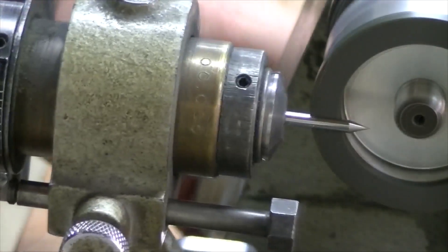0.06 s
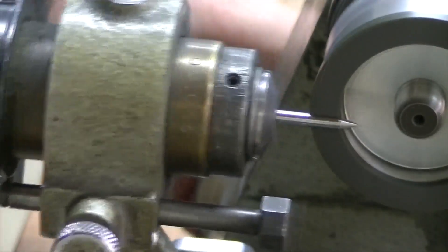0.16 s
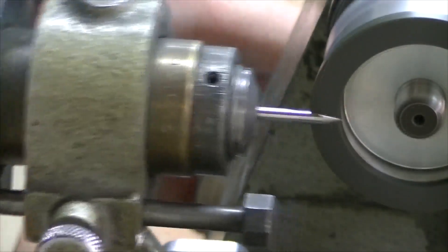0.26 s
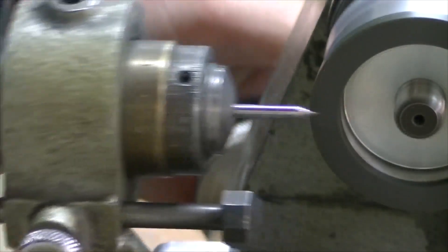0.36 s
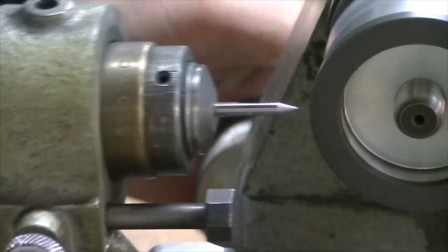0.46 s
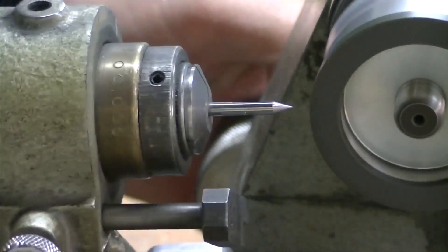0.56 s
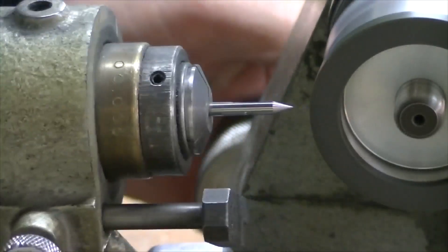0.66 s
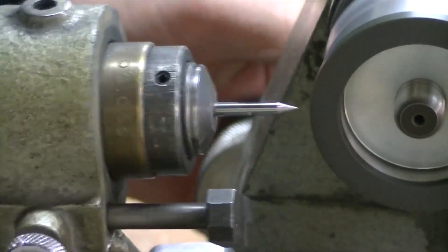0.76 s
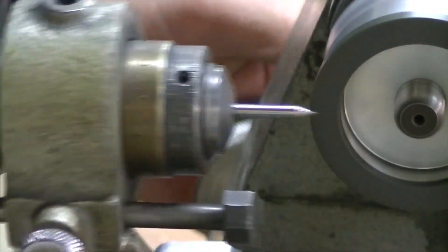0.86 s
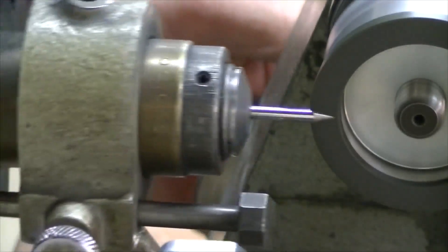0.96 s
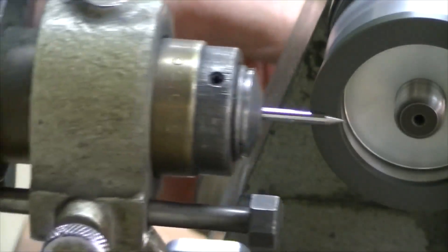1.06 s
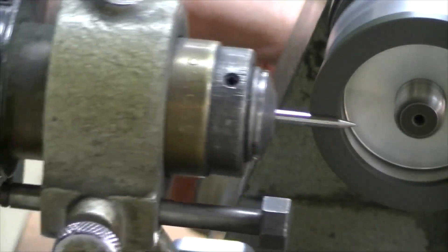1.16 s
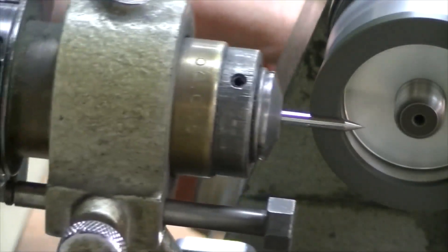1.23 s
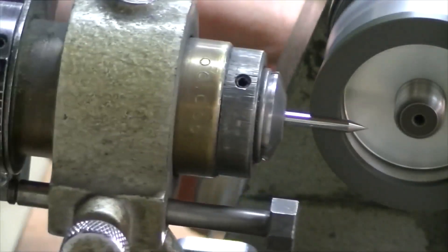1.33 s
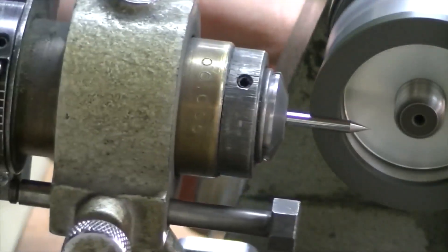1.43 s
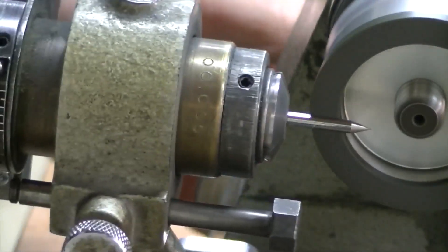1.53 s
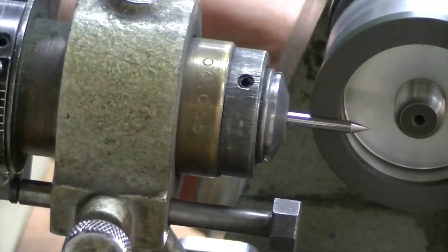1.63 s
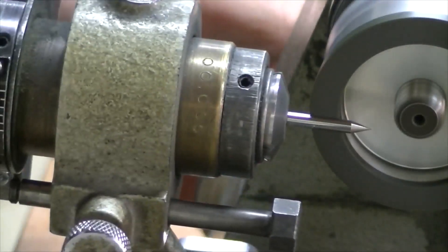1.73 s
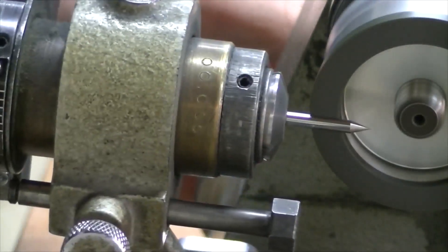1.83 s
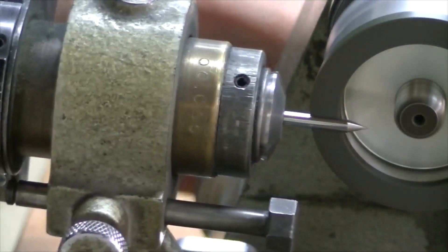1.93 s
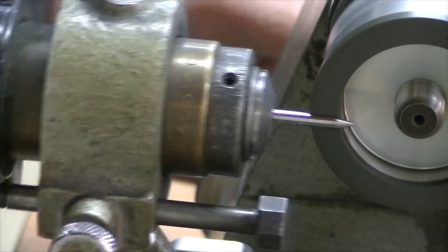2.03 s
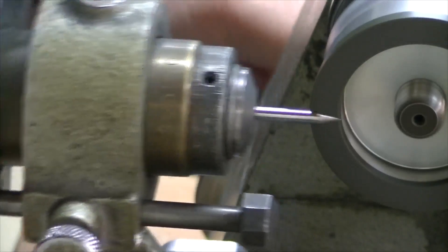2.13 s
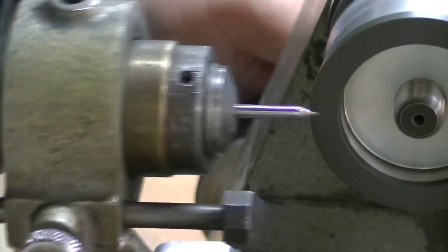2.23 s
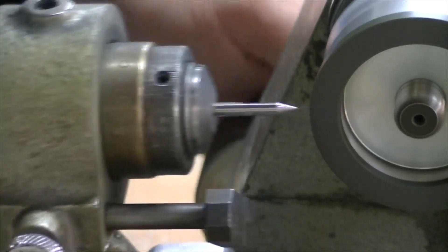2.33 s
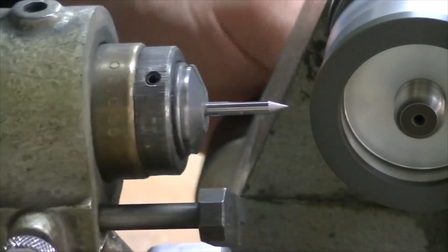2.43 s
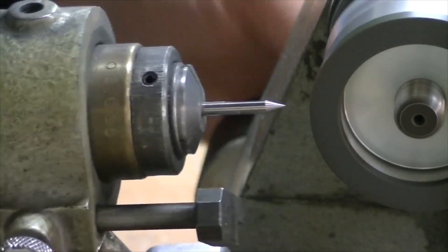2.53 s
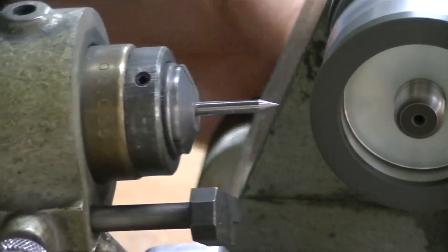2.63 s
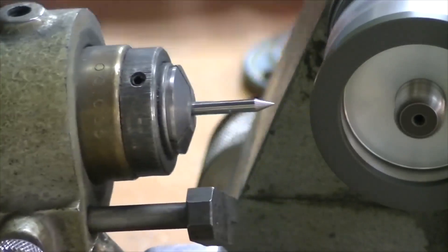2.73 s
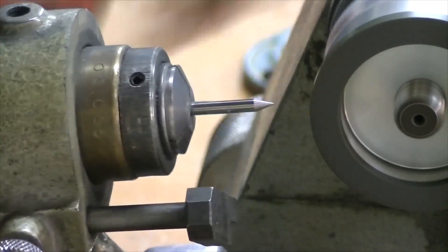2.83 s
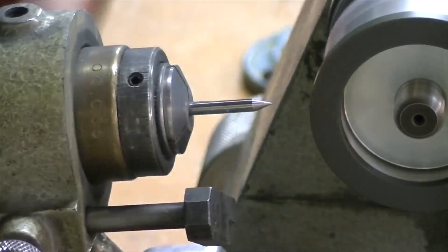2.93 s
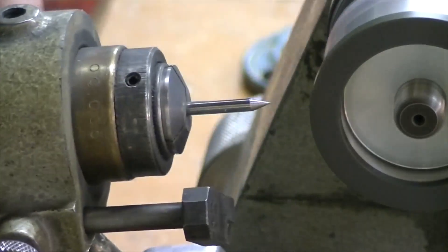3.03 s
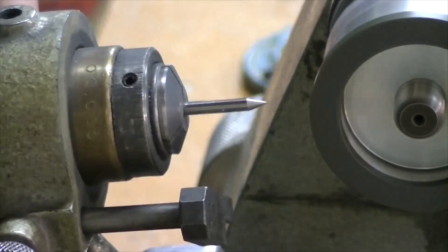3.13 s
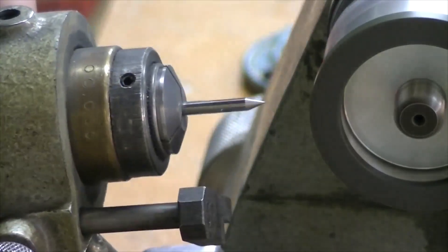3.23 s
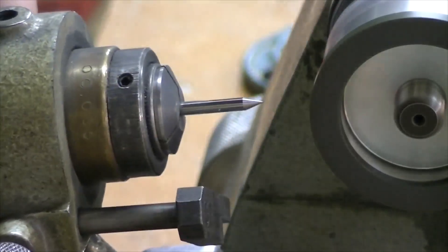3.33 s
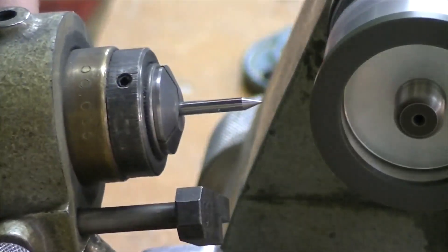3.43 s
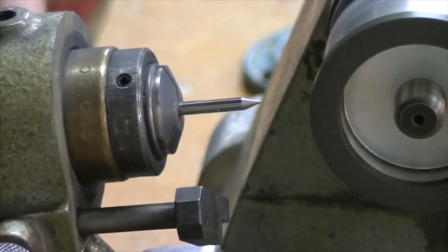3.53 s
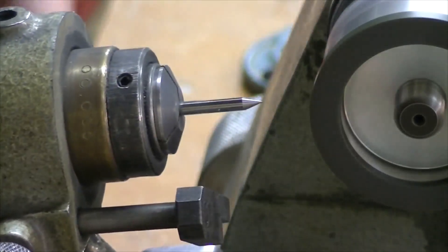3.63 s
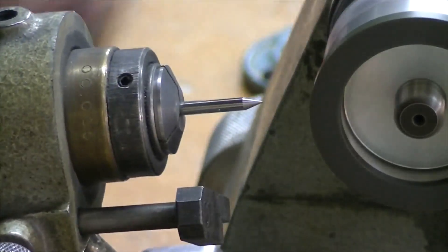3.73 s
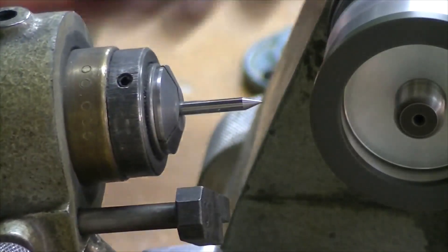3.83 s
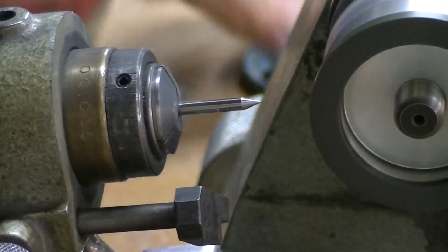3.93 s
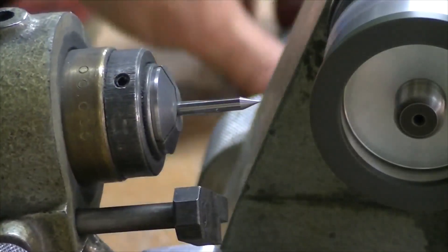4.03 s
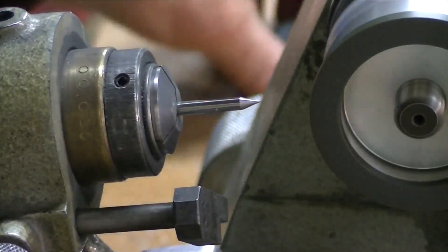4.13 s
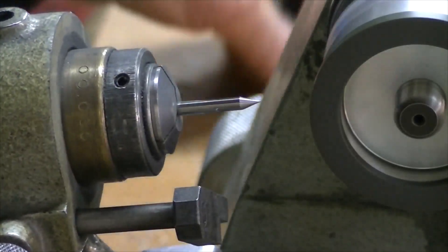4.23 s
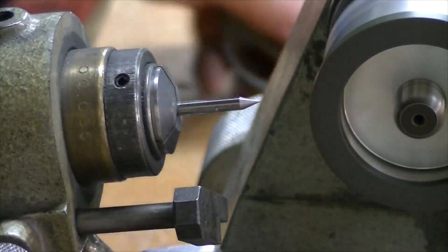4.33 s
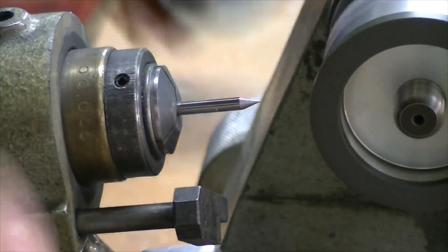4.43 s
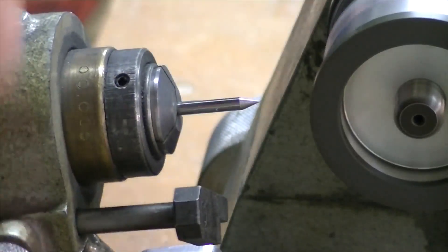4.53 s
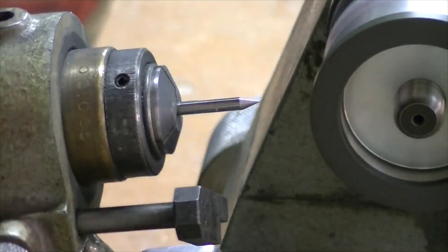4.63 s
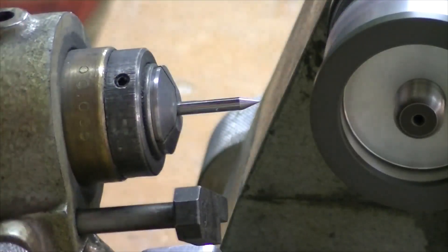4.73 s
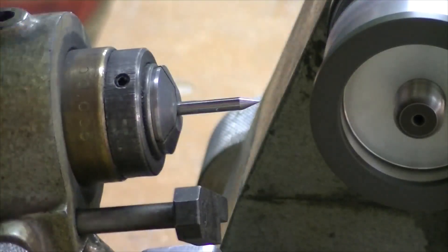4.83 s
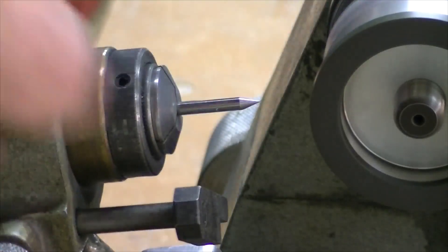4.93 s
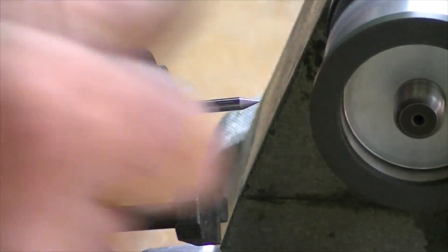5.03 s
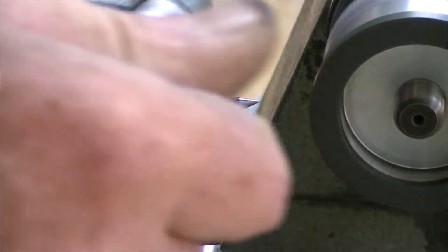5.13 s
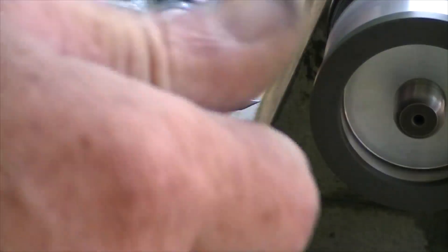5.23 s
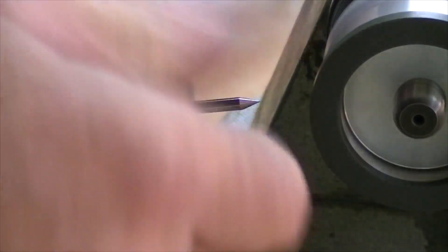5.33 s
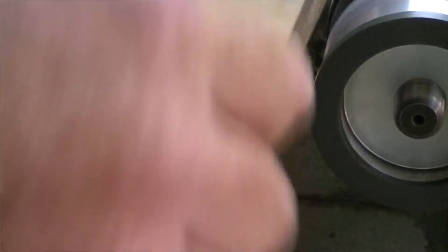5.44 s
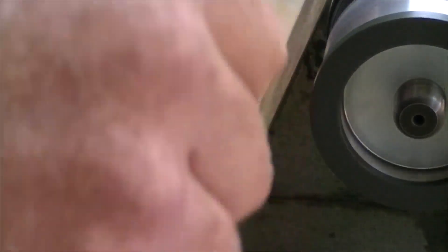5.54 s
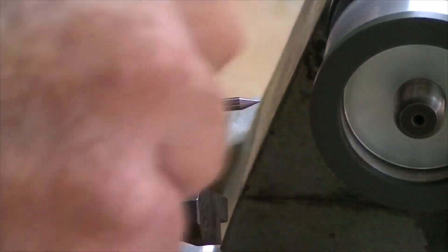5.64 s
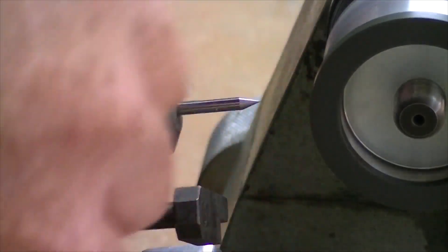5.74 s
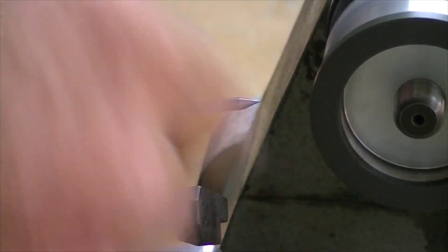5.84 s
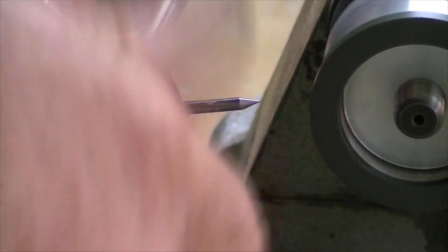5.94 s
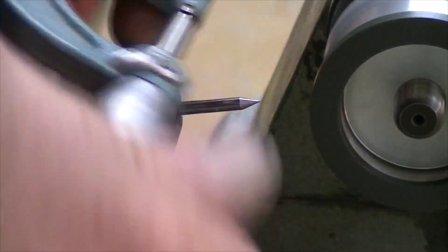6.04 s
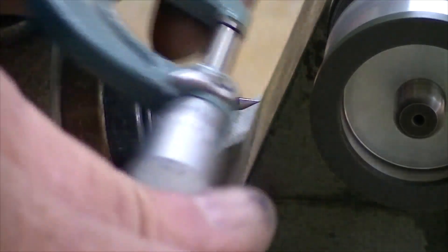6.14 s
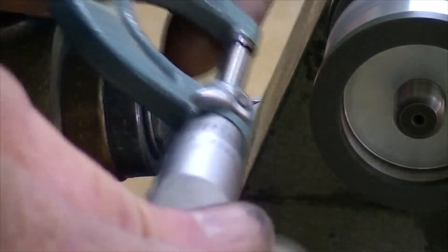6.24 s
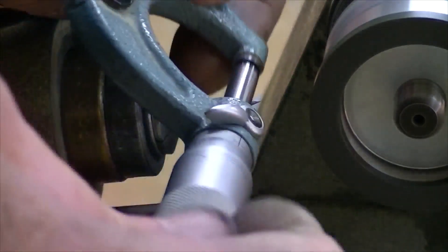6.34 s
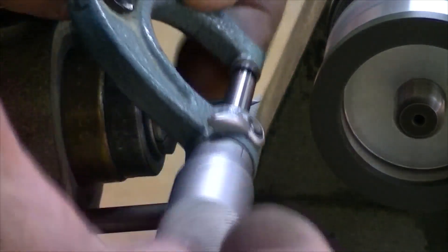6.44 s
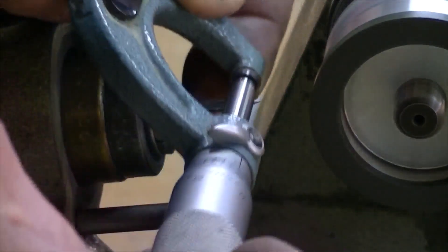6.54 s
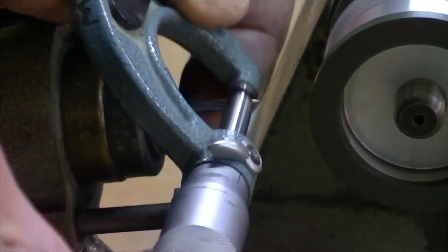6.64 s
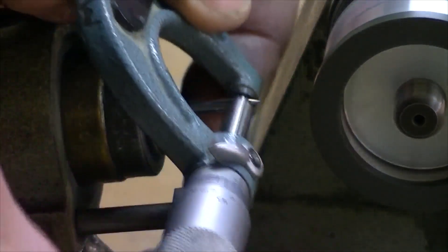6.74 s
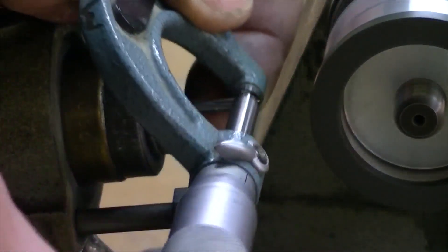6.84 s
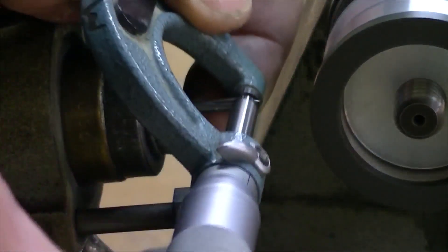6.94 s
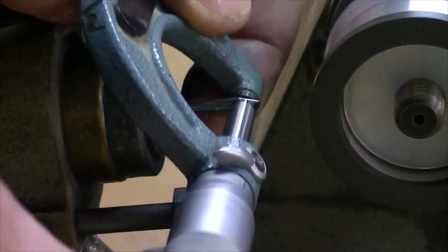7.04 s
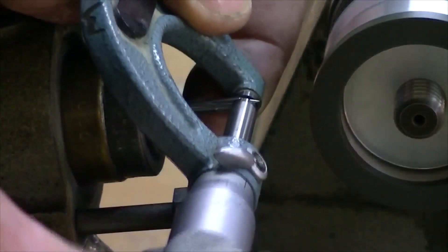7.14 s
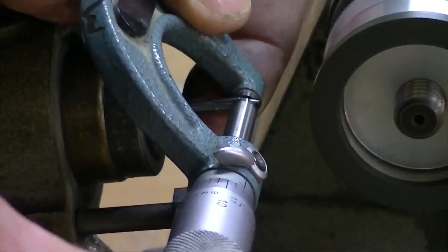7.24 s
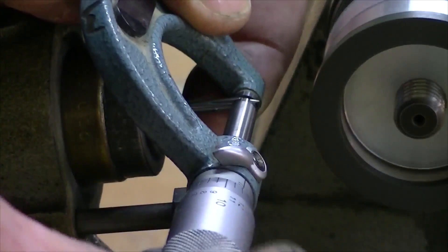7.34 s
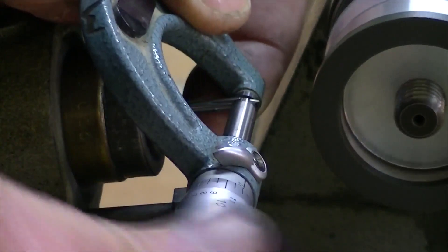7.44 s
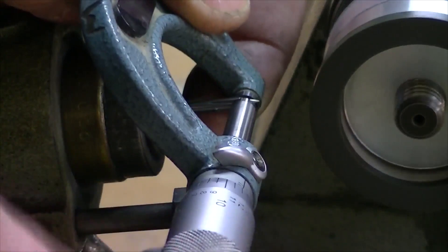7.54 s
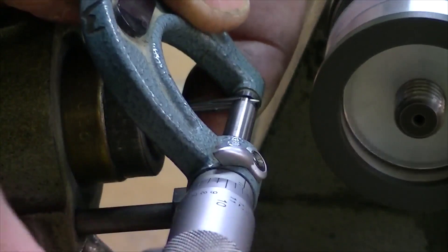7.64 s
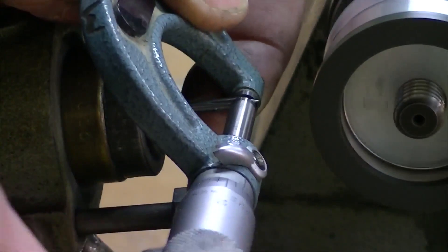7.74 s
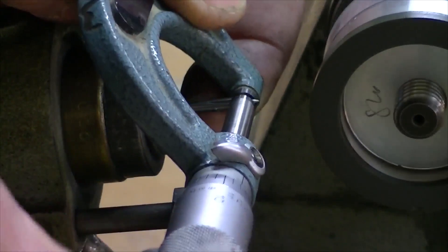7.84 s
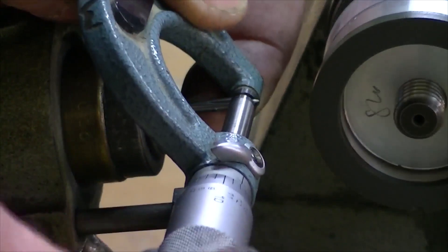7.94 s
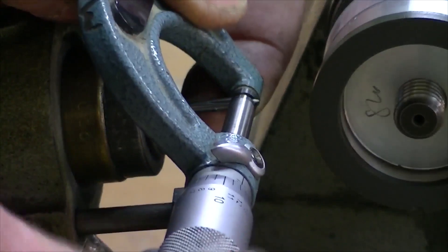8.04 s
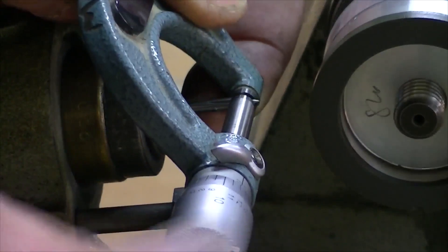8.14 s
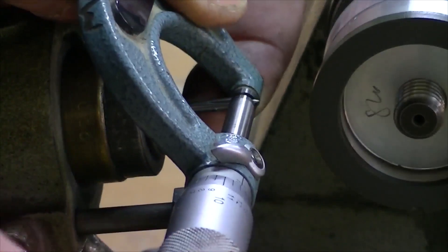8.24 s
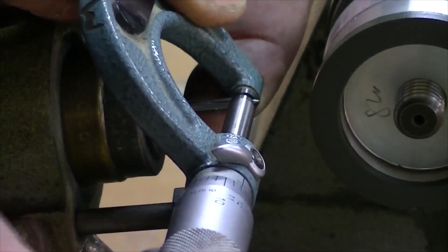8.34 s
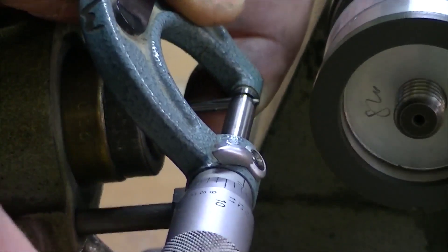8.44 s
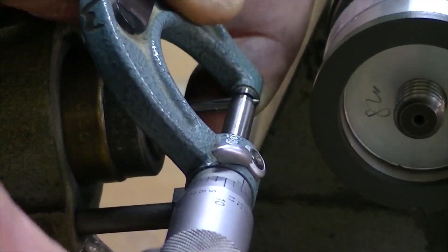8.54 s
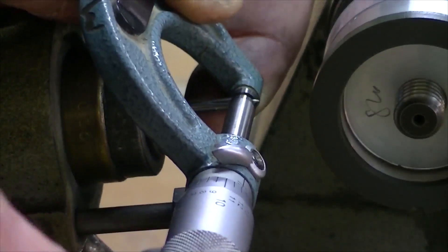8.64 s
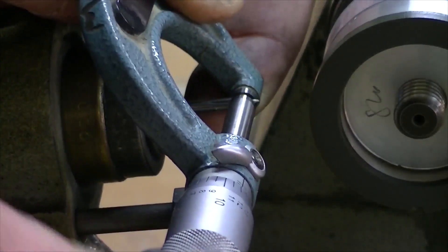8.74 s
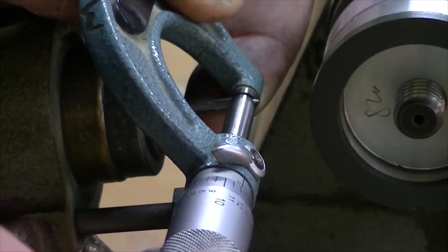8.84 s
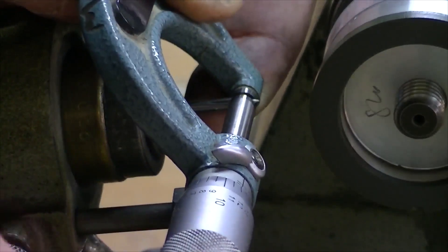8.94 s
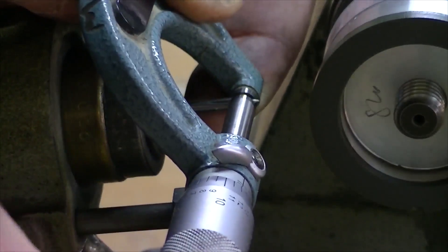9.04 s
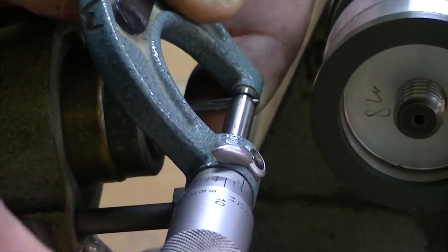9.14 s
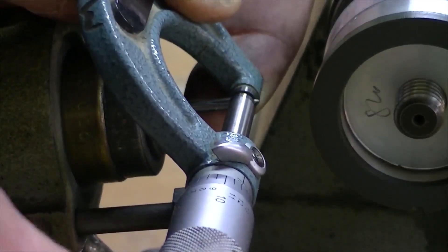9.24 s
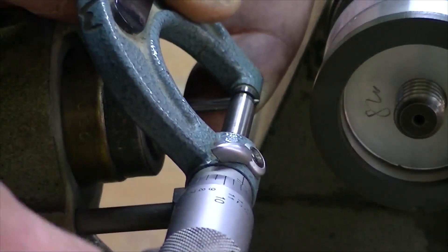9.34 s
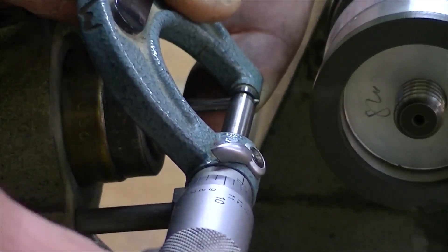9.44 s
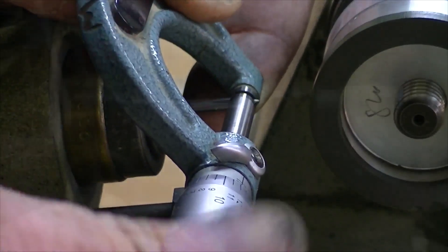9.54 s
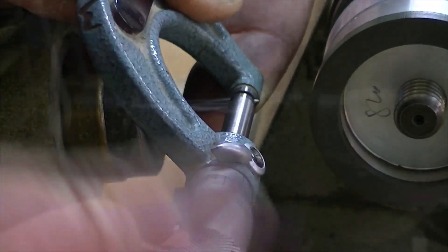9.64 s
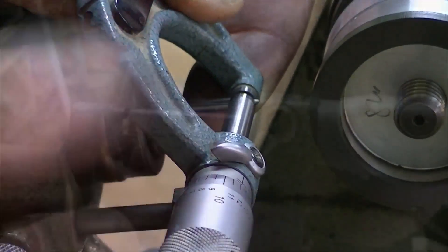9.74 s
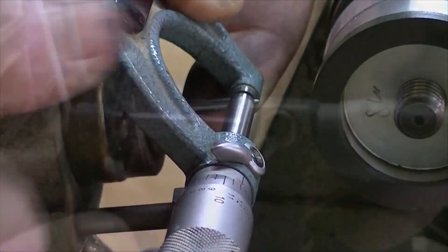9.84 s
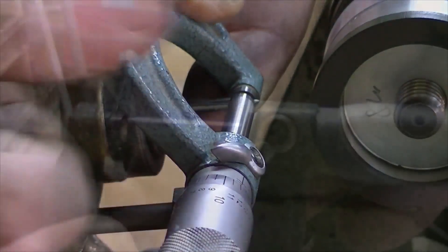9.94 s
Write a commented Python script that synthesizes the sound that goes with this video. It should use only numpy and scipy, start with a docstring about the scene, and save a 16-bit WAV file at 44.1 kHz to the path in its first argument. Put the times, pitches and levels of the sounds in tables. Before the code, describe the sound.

Close, nearly centred pickup in a small quiet workshop. At the start a small spindle is already spinning fast on worn bearings: dense gritty whir, thin metallic whines and a tonal hum. It dips slightly, rises to a peak around 1.1-1.5 s, drops by 2 s, and surges again to about 2.6 s. Then it coasts steadily, the whines sliding down and sinking into the noise, squealing briefly near 3.2 s. From 5 to 7 s it becomes a coarse, throbbing, rattling rumble, fading after 7 s with a few hollow knocks around 7.5-7.7 s. Faint thimble ticks run from 6.95 to 7.8 s. Bright, hard steel ratchet clicks follow: a rapid cluster at 7.8-8.05 s, five at 8.5-8.7 s, six at 9.15-9.4 s, each with a tiny shiver and short room tail. Very faint pips appear at 8.1-8.9 s; soft shop air remains.

```python
"""A small grinding spindle on worn ball bearings speeds up twice, then coasts almost to a stop.
Rough noise, loose knocks and whining lines from the bearings ring its casing; hums follow the speed.
Then a hand turns a micrometer: its thimble ticks, and its ratchet clicks in three bursts of
filtered noise and ringing steel. A few faint pips sound among the clicks; behind it all lies a
quiet shop, made of soft noise, a faint wavering tone and a short echo tail."""
import sys
import numpy as np
from scipy import signal
from scipy.fft import rfft, irfft
from scipy.io import wavfile
from scipy.ndimage import uniform_filter1d

SR = 44100
rng = np.random.default_rng(int(sys.argv[2]) if len(sys.argv) > 2 else 0)


def persist_wave(psi):
    """Save psi, clipped to +-1, as 16-bit WAV."""
    counts = np.round(np.clip(psi, -1, 1) * 32767).astype(np.int16)
    wavfile.write(sys.argv[1], SR, np.atleast_2d(counts).T)


N = 440118
T, HZ = np.arange(N) / SR, np.fft.rfftfreq(2048, 1 / SR)  # time of each sample; pitch of each filter band

# Shaft speed, two spurts and a long coast: t/s, turns per second f/Hz
SHAFT_SPEED = [(0, 230.4), (.12, 217.5), (.22, 217), (.42, 230), (.62, 251), (.9, 273.5), (1.13, 284.5),
               (1.22, 283.5), (1.4, 277.8), (1.53, 277), (1.8, 235), (1.97, 221.5), (2.12, 231.5),
               (2.3, 240), (2.63, 270.5), (3.02, 245.3), (3.6, 211), (4.8, 146), (5.4, 119.7), (6, 89.4),
               (7.9, 1)]
# Bearing rumble: t/s, level/dB, brightness/(dB per octave)
RUMBLE = [(0.0, -17.5, 0), (0.7, -17.5, 1.16), (1.5, -17, 0.3), (3.3, -17, 0.53), (3.6, -17, 0.67),
          (6.0, -14.5, -0.1), (6.3, -15, 0.5), (6.9, -18, 0.24), (7.45, -25.5, 0.4), (7.63, -32.5, -0.3),
          (7.76, -39.5, 1), (8.0, -70, -11)]
# Colour of the rumble at high, low and crawling speed: f/Hz, level/dB (per Hz)
FAST_COLOUR = [(18, -86.5), (30, -49), (93, -27), (170, -21.5), (266, -12.5), (328, -9), (1070, -3),
               (1280, -2), (1720, -7), (3490, -6.5), (7270, -20.5), (9220, -15.5), (12000, -25),
               (16000, -36)]
SLOW_COLOUR = [(18, -79.5), (30, -37), (123, -17.5), (324, -28.5), (379, -16.5), (591, -14.5), (709, -7.5),
               (1050, -13.5), (1170, -6), (1870, -12), (2910, 2), (7260, -19.5), (8950, -18.5),
               (12000, -25), (15500, -37.5)]
CRAWL_COLOUR = [(18, -86), (30, -44), (303, -17), (384, -1.5), (499, -7), (721, -4), (1040, -14),
                (1190, -3), (1500, -7), (3490, -10.5), (6900, -25.5), (9220, -23.5), (11000, -27.5),
                (13200, -29.5), (16000, -37)]
# Shaft speeds that go with the crawling, slow and fast colours: f/Hz
COLOUR_SPEEDS_HZ = [22, 103.1, 244.6]
# Casing modes, the pitches at which it likes to ring: f/Hz
MODES_HZ = [388, 467, 711, 958, 1140, 1200, 1320, 1400, 1600, 2375, 2960, 3250, 3475, 3640, 3980, 4135,
            4345, 4600, 5290, 6010, 6285, 6945, 9248]
# How each casing mode stands out: width/Hz, boost when fast level/dB, boost when slow level/dB
CASING = [(70, -9.5, 8.4), (23.1, 1.5, 7.3), (31.2, 8.5, 12), (39.8, 6.5, 12), (40, -11.5, 9),
          (30.23, 7.5, 17.9), (117, 5, 4.48), (58.6, 4.5, 1.6), (99, -1, 1.9), (170, 2, 11.2),
          (110, 8, 6.6), (60, 7.5, 3.3), (100, 5.5, 5.7), (80, 2, 9.2), (60, 7.5, 4.6), (143.8, 1.5, 1.7),
          (60, 5, 7.4), (150, -0.5, 1.1), (194.6, 4.5, 5.7), (90, 3.5, 3), (80, 6.5, 4), (80, 2.5, 2.9),
          (153, 8, 6.3)]
SURGE_DB, SURGES_PER_S = 1.8, 5  # chance swelling of each casing mode

# Single lines from cage, shaft and passing balls: multiple of the shaft speed
ORDER_LINES = [3, 3.29, 4, 4.38, 4.71, 6.67, 7, 8, 9.25, 13, 15.3]
# Their starting levels against the race noise: level/dB
ORDER_LINES_DB = [-29, -33, -32, -38, -27.5, -32, -31, -28, -31, -30, -30]
BALL_SPIN = 2.26  # turns of a ball for each turn of the shaft
# Combs of lines one ball spin apart: first multiple of the speed, number of lines
COMBS = [(11.2, 9), (11.56, 9), (9.72, 5)]
# Starting level of each comb: level/dB
COMB_DB = [-26.5, -27.0, -29.0]
# Outline laid over the combs: multiple of the speed, level/dB
COMB_SHAPE = [(9.7, -6), (13.5, -2), (16, 1.5), (19, -1), (25, 1), (29.6, -4)]
# Squeals, where lines near one multiple flare up: t/s, length/s, multiple of the speed, level/dB
SQUEALS = [(-.3, .85, 15.9, 9), (.55, .6, 11.4, 5), (.6, .65, 16.1, 3), (.9, .9, 4.7, 3), (.9, .5, 24.8, 3),
           (2.38, .25, 15.9, 7), (2.7, .5, 18.2, 5), (2.75, .35, 25, 5), (3.1, .38, 15.7, 10),
           (3.0, .9, 13.5, 3), (3.05, .5, 27.2, 7), (3.7, .7, 20.3, 4)]
SQUEAL_SPAN = 1.2  # width of a squeal, in multiples of the speed
SING_DB, SING_SPREAD = 5.0, 1.3  # most that a casing mode lifts a line; reach in mode widths
SLIP_DB, FLUTTER_DB = 3.2, 2.0  # slow swell and quick flutter of each line
SKID_HZ_PER_S, SKID_DB_PER_HZ_PER_S = 62, -.14  # braking beyond this makes balls skid and lines fade
THROB, THROB_BELOW_HZ, THROB_ORDER = .22, 90.0, .782  # slow bearing throbs twice per turn of the cage

# Hums of unbalance, cage, twice a turn, ball spin, shaft less cage, twice shaft less cage:
# multiple of the shaft speed
HUMS = [1, .391, 2, 2.266, .62, 1.62]
# Their strengths before speed and stand act on them: level/dB
HUMS_DB = [0.5, -2.5, -10.0, -9.5, -15.5, -19]
# How far each hum comes and goes: level/dB
HUMS_WAVER_DB = [.7, 1.0, 2.0, 1.8, 3.0, 3.0]
HUM_DB_PER_DECADE = 23  # hums grow with speed
# How well stand and bench carry a hum: f/Hz, level/dB
STAND = [(40, -58), (60, -63), (76, -47), (90, -47.5), (103, -43), (111, -51), (140, -34.5), (163, -49),
         (182, -44.5), (196, -37.5), (235, -36.5), (284, -29.5), (330, -36.5), (372, -24.5), (420, -29.5),
         (445, -36), (468, -19.5), (500, -29.5), (535, -31), (565, -25), (600, -35.5), (640, -29)]
# Last ball knocks ringing the casing: t/s, level/dB, f/Hz, time to fall by 60 dB/s
LAST_KNOCKS = [(7.5, -20.5, 384, 0.32), (7.569, -18.5, 377, 0.21), (7.64, -14, 726, 0.089),
               (7.69, -14.5, 712, .17), (7.81, -32, 470, 0.18), (7.86, -41, 712, .2)]
# Stereo width of the rumble, side against mid: f/Hz, level/dB
RUMBLE_WIDTH = [(20, -2.5), (60, -12), (100, -22), (180, -12.5), (310, -19), (550, -20), (950, -24.5),
                (1650, -24.5), (2860, -18.5), (4970, -12.5), (8640, -22), (15000, -42.5)]

# Ratchet clicks: t/s, peak level/dB, boosted pitch f/Hz, frame ring against the click level/dB
RATCHET = [(7.81, -10.5, 8000, -33), (7.862, -10, 8500, -45), (7.936, -9.5, 8900, -40),
           (7.959, -14, 7880, -20.5), (7.977, -9.5, 9820, -26), (7.997, -10.5, 8720, -22),
           (8.044, -9.5, 7700, -26.5), (8.506, -11.5, 7460, -31.5), (8.545, -11, 8450, -37),
           (8.587, -8.5, 8660, -35), (8.635, -10, 7000, -33), (8.702, -9, 9800, -37),
           (9.155, -12.5, 7100, -30.5), (9.185, -13, 8290, -33), (9.21, -11, 7200, -35),
           (9.25, -13.5, 8190, -26.5), (9.318, -12, 10100, -39), (9.408, -9.5, 8100, -35)]
# Colour of the pawl's snap: f/Hz, level/dB (per Hz)
SNAP = [(350, -64), (600, -32), (1490, -25.5), (4520, -11), (5190, -5), (6290, -8.5), (8270, -5),
        (10600, -8.5), (12200, -14), (16000, -24.5)]
LOW_BODY_DB, LOW_BODY_SPREAD_DB = 1.5, 1.8  # average and chance spread of a click's low body
# Colour of the steel's shiver: f/Hz, level/dB (per Hz)
SHIVER = [(1180, -47), (2000, -10), (2400, -18), (2690, -15), (3840, -11), (6360, -4), (8550, -6),
          (13000, -26), (16000, -27)]
SHIVER_DB = -31.5  # starting level against the click's peak
# Frame modes, highest pitch each can take: f/Hz, level/dB, time to fall by 60 dB/s
FRAME = [(1560, -6.5, 0.18), (1665, 7.5, 0.051), (1280, 0, 0.043), (990, -9, 0.062), (720, -22, 0.21)]
# Thimble ticks: t/s, level/dB
THIMBLE = [(6.9546, -30), (7.0469, -29), (7.2898, -22), (7.3014, -30), (7.3387, -28), (7.3746, -35),
           (7.416, -26), (7.4774, -34), (7.5058, -37), (7.5592, -34), (7.648, -38), (7.7737, -47)]
# Thimble modes, pitch before chance detuning: f/Hz, level/dB, time to fall by 60 dB/s
SLEEVE = [(5300, 1, 0.013), (8300, 3, 0.0069), (9140, 1.5, 0.017), (11300, 8, 0.0042), (7000, -6, .003),
          (12500, -6, .003)]

# Higher and lower faint pip: peak level/dB, f/Hz, time to fall by 60 dB/s
HIGH_PIP = (-50.5, 3900, 0.012)
LOW_PIP = (-61, 2865, 0.03)
# When they sound: t/s
HIGH_PIPS_S = [8.135, 8.202, 8.268, 8.302, 8.435, 8.769, 8.835]
LOW_PIPS_S = [8.09, 8.12, 8.146, 8.188, 8.211, 8.255, 8.279, 8.312, 8.385, 8.411, 8.444, 8.484, 8.822,
              8.846, 8.891]

# Colour of the quiet shop air, relative: f/Hz, level/dB (per Hz)
AIR = [(12, -58), (20, -24), (70, -16.5), (91, -15), (146, -13), (234, -17), (513, -23), (678, -24),
       (897, -25.5), (4810, -34), (16000, -45)]
AIR_DB = -57  # average level of the air noise in mid
# Stereo width of the air, side against mid: f/Hz, level/dB
AIR_WIDTH = [(20, 1.5), (60, -10.5), (180, -8), (550, -4), (1650, -5.5), (4970, -8), (15000, -6.5)]
# A faint tone in the shop: f/Hz, level/dB about which it wavers
DRONE = (662, -72)
# Difference in colour, left against right: f/Hz, level/dB
LEAN = [(950, 0.0), (2380, -0.6), (5980, -0.6), (15000, 0.0)]
EDGE_HZ = 15900  # top of the sound


def spindle():
    """Bearing noise and lines pass the casing, while slower hums reach the ear through stand and bench."""
    at, speed = np.transpose(SHAFT_SPEED)
    hz = uniform_filter1d(np.interp(T, at, speed), size=3001, mode="nearest")
    turns = np.cumsum(hz) / SR
    frames = np.arange(N // 512 + 2) * 512 / SR  # times at which the casing filter is set
    frame_hz = np.interp(frames, at, speed)
    race = race_noise(hz, turns)
    race[0] += bearing_lines(turns, hz, frames, frame_hz)
    mid_db = casing_db(frames, frame_hz)
    side_db = mid_db + read(RUMBLE_WIDTH, HZ)[:, None]
    mid, side = shaped(race, np.array([mid_db, side_db]))
    tones = hums(hz, turns)
    add_last_knocks(tones)
    return mid + tones, side + .012 * np.roll(tones, 40)


def race_noise(hz, turns):
    """Loose balls knock at random on rough races, more rarely and so more distinctly as the shaft slows."""
    struck = rng.random(N) < (40 + 2.5 * hz) / SR
    knocks = struck * gain_of(7.8 * np.minimum(rng.exponential(1, N), 3.2))
    # each knock fades with a time constant of 3.9 ms
    chatter = evened(signal.lfilter([1], [1, -np.exp(-1 / (0.0039 * SR))], knocks))
    throb = THROB * np.cos(2 * np.pi * THROB_ORDER * turns) / (1 + (hz / THROB_BELOW_HZ) ** 4)
    loudness = evened((1.0 + 0.17 * chatter) * (1 + throb))
    return rng.standard_normal((2, N)) * loudness


def bearing_lines(turns, hz, frames, frame_hz):
    """Tones locked to the turning shaft, each louder while it crosses a casing mode or squeals."""
    lines = list(zip(ORDER_LINES, ORDER_LINES_DB))
    for (first, count), db in zip(COMBS, COMB_DB):
        k = first + BALL_SPIN * np.arange(count)
        lines += zip(k, db + np.interp(k, *np.transpose(COMB_SHAPE)))
    fading_db = 26.0 * np.log10(hz / 230)  # slow balls slip, so their tones sink into the noise
    braking = np.maximum(-np.gradient(hz) * SR - SKID_HZ_PER_S, 0)
    fading_db += SKID_DB_PER_HZ_PER_S * uniform_filter1d(braking, size=9001, origin=3000)
    slips_db = SLIP_DB * wander(4.0, count=len(lines))
    flutters_db = FLUTTER_DB * wander(45, count=len(lines))
    out = np.zeros(N)
    for (k, db), chance_db in zip(lines, slips_db + flutters_db):
        on_mode = sum(peak(k * frame_hz, f, SING_SPREAD * width)
                      for f, (width, *_) in zip(MODES_HZ, CASING))
        flare_db = sum(top_db * peak(k, at, SQUEAL_SPAN)
                       * np.sin(np.pi * np.clip((frames - start) / length, 0, 1))
                       for start, length, at, top_db in SQUEALS)
        lift_db = SING_DB * np.minimum(on_mode, 1) + flare_db
        level_db = db + fading_db + chance_db + np.interp(T, frames, lift_db)
        out += np.sqrt(2) * gain_of(level_db) * np.sin(2 * np.pi * (k * turns + rng.random()))
    return out


def casing_db(frames, frame_hz):
    """The casing colours the noise: its mix of spectra follows the speed and its modes stand out."""
    stage = np.interp(frame_hz, COLOUR_SPEEDS_HZ, range(3))
    share = np.clip(1 - abs(stage - np.arange(3)[:, None]), 0, 1)  # of crawl, slow and fast
    colours = [read(points, HZ) for points in (CRAWL_COLOUR, SLOW_COLOUR, FAST_COLOUR)]
    body_db = np.transpose(colours) @ share
    surges_db = SURGE_DB * wander(SURGES_PER_S, count=len(CASING))
    for f, (width, fast_db, slow_db), surge_db in zip(MODES_HZ, CASING, surges_db):
        boost_db = slow_db + (fast_db - slow_db) * share[2] + np.interp(frames, T, surge_db)
        body_db += np.outer(peak(HZ, f, width), boost_db)
    at, level_db, bright = np.transpose(RUMBLE)
    octaves = np.log2(np.clip(HZ, 300, 16000) / 2000)
    body_db += np.outer(octaves, np.interp(frames, at, bright))
    # even out the power first, so that the rumble table alone sets the level
    body_db -= 10 * np.log10(np.mean(gain_of(2 * body_db), axis=0))
    return body_db + np.interp(frames, at, level_db, right=-120)


def hums(hz, turns):
    """Low tones that follow the shaft, grow with its speed and swell where stand and bench carry them."""
    drive_db = HUM_DB_PER_DECADE * np.log10(hz / 250)
    waver_db = np.c_[HUMS_WAVER_DB] * wander(5.6, count=len(HUMS))
    out = np.zeros(N)
    for k, db, chance_db in zip(HUMS, HUMS_DB, waver_db):
        level_db = db + drive_db + chance_db + read(STAND, k * hz)
        out += np.sqrt(2) * gain_of(level_db) * np.sin(2 * np.pi * k * turns)
    return out


def add_last_knocks(tones):
    """The balls' last knocks each ring one casing mode, with a soft 30 ms rise."""
    for start, db, f, t60 in LAST_KNOCKS:
        add(tones, start, gain_of(db) * ring(f, t60, .03))


def micrometer():
    """Ratchet and thimble, both struck steel, on one track."""
    out = np.zeros(N)
    add_ratchet(out)
    add_thimble(out)
    return out


def add_ratchet(out):
    """The pawl snaps for a few milliseconds, the steel shivers on and the frame rings low."""
    t, f = T[:256], np.fft.rfftfreq(256, 1 / SR)
    rise = np.minimum(t / .0007, 1)
    cut = 1 + np.exp((t - .0028) / .0004)
    burst = rise * np.exp(-t / .003) / cut
    for start, db, hz, frame_db in RATCHET:
        body_db = LOW_BODY_DB + LOW_BODY_SPREAD_DB * rng.standard_normal()
        colour_db = 6.2 * peak(f, hz, 1000) + body_db * (f < 4600)
        snap = burst * irfft(rfft(coloured(SNAP, size=256)) * gain_of(colour_db))
        add(out, start, gain_of(db) * snap / abs(snap).max())
        fade_db = -60 * T[:8192] / 0.22
        add(out, start + 0.00105, gain_of(db + SHIVER_DB + fade_db) * coloured(SHIVER, size=8192))
        for mode_hz, mode_db, t60 in FRAME:
            tone = ring(mode_hz * rng.uniform(0.975, 1.0), t60, 0.0021)
            add(out, start, gain_of(db + frame_db + mode_db) * tone)


def add_thimble(out):
    """Each tick rings the thimble's high modes, a little out of tune by chance."""
    for start, db in THIMBLE:
        for hz, mode_db, t60 in SLEEVE:
            tone = ring(hz * rng.uniform(0.93, 1.05), t60, 0.00022)
            add(out, start, gain_of(db + mode_db) * tone)


def pips():
    """Faint short tones at two pitches, each with a soft start and a quick fade."""
    out = np.zeros(N)
    for (db, hz, t60), times in ((HIGH_PIP, HIGH_PIPS_S), (LOW_PIP, LOW_PIPS_S)):
        pip = ring(hz, t60, t60 / 3)
        for start in times:
            add(out, start, gain_of(db) * pip / abs(pip).max())
    return out


def shop(x):
    """The room answers with a noisy tail that falls 60 dB in 0.13 s; one for mid, one for side."""
    t = T[:12000]
    tail = rng.standard_normal((2, len(t))) * gain_of(-60 * t / 0.13) * np.minimum(t / 0.0016, 1)
    tail /= np.linalg.norm(tail[0])
    return signal.fftconvolve(x[None], tail, axes=1)[:, :N] * gain_of([[-20], [-24]])


def air():
    """The quiet of the shop: steady coloured noise and a faint wavering tone."""
    mid_db = read(AIR, HZ)[:, None]
    side_db = mid_db + read(AIR_WIDTH, HZ)[:, None]
    mid, side = shaped(rng.standard_normal((2, N)), np.array([mid_db, side_db]))
    hz, tone_db = DRONE
    tone = gain_of(tone_db + 3.0 * wander(6, count=1)[0]) * np.sin(2 * np.pi * hz * T)
    return gain_of(AIR_DB) * np.array([mid, side]) / np.std(mid) + np.outer([1, .2], tone)


def gain_of(db):
    """Turns decibels into a plain multiplier."""
    return 10 ** (np.asarray(db) / 20)


def evened(x):
    """Scales a signal to an average (rms) level of 1."""
    return x / np.sqrt(np.mean(x ** 2) + 1e-20)


def read(points, hz):
    """Reads a curve between its points, with pitch on a log scale."""
    f, value = np.transpose(points)
    return np.interp(np.log(hz + 1), np.log(f + 1), value)


def add(mix, start, sound):
    """Mixes a sound in at a time in seconds, cutting it at the end of the mix."""
    part = mix[round(start * SR):][:len(sound)]
    part += sound[:len(part)]


def shaped(x, db):
    """Filters by a gain in dB for each pitch band, fixed or changing in time."""
    z = signal.stft(x, nperseg=2048, noverlap=1536)[2]
    return signal.istft(z * gain_of(db), nperseg=2048, noverlap=1536)[1][..., :N]


def wander(rate_hz, count):
    """Random curves of about rms 1, drawn as straight lines between chance points."""
    knots = np.arange(int(N / SR * rate_hz) + 3) / rate_hz
    heights = rng.standard_normal((count, len(knots)))
    return np.array([np.interp(T, knots, row) for row in heights]) * np.sqrt(1.5)


def coloured(points, size):
    """A short noise of rms 1 with the given spectrum."""
    gain = gain_of(read(points, np.fft.rfftfreq(size, 1 / SR)))
    return evened(irfft(rfft(rng.standard_normal(size)) * gain, size))


def ring(hz, t60, rise):
    """One ringing mode: a soft start, then a fall of 60 dB in t60 seconds."""
    t = T[:round(t60 * SR) + 9]
    return gain_of(-60 * t / t60) * (1 - np.exp(-t / rise)) * np.sin(2 * np.pi * hz * t)


def peak(x, centre, width):
    """Shape of a resonance: 1 at its centre, half at half a width to either side."""
    return 1 / (1 + (2 * (x - centre) / width) ** 2)


def scene():
    """Mid (centre) and side (width) of all sources, turned into left and right."""
    hand = micrometer()
    mid, side = spindle() + air() + shop(hand) + np.outer([1, .03], hand + pips())
    return np.array([mid + side, mid - side])


def record(dry):
    """Two microphone capsules differ a little in colour; peaks are rounded, then the top is cut off."""
    f = np.fft.rfftfreq(N, 1 / SR)
    pair = irfft(rfft(dry) * gain_of(np.outer([.5, -.5], read(LEAN, f))), N)
    soft = pair / (1 + abs(pair / 1.1) ** 4) ** .25
    low_pass = signal.firwin(511, EDGE_HZ, window=("kaiser", 9), fs=SR)
    return signal.oaconvolve(soft, low_pass[None], "same")


dry = scene()
out = record(dry)
persist_wave(out)
```